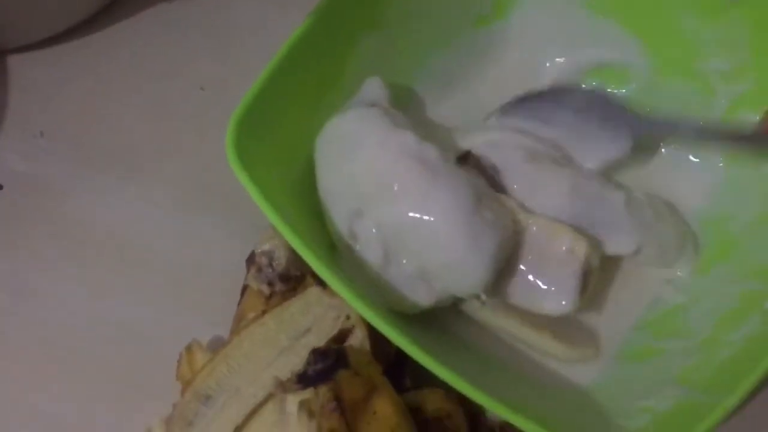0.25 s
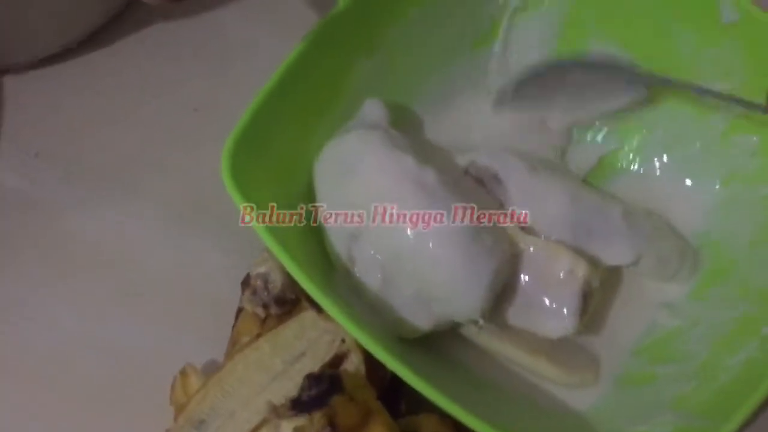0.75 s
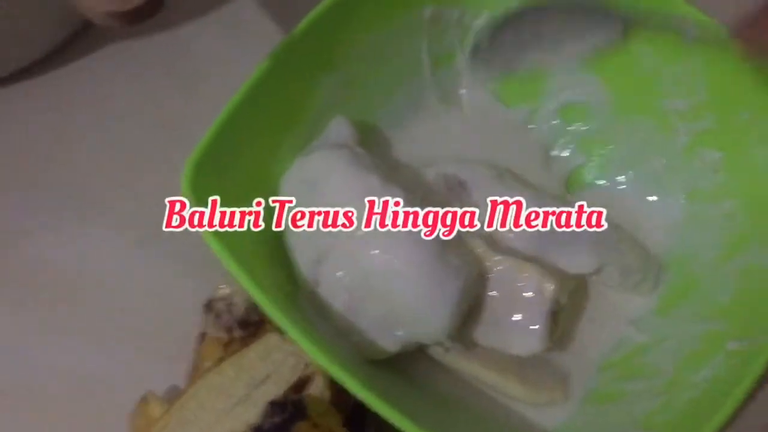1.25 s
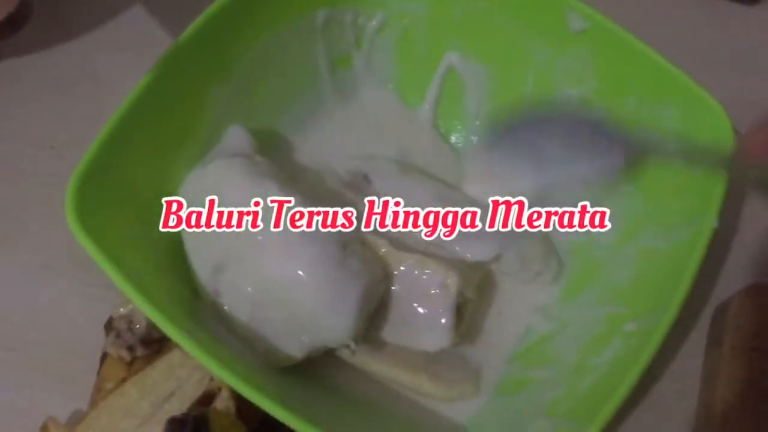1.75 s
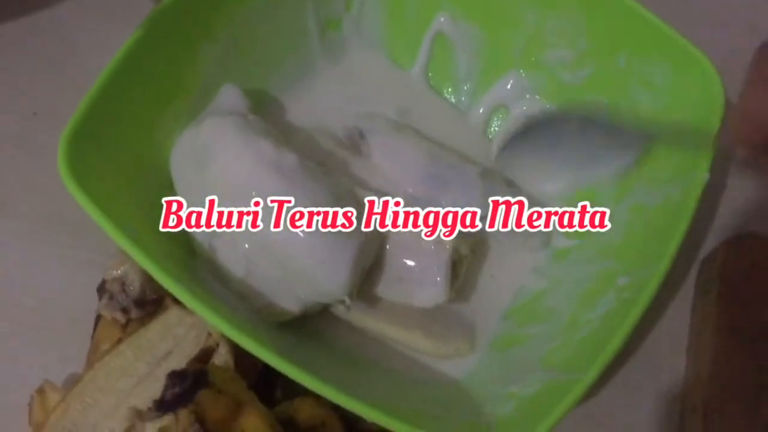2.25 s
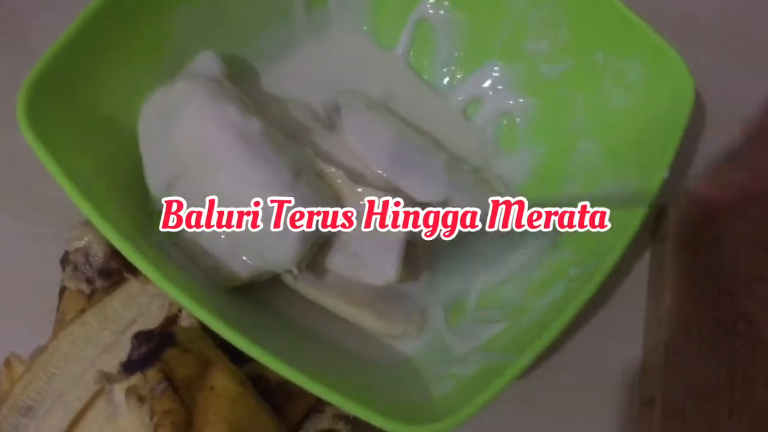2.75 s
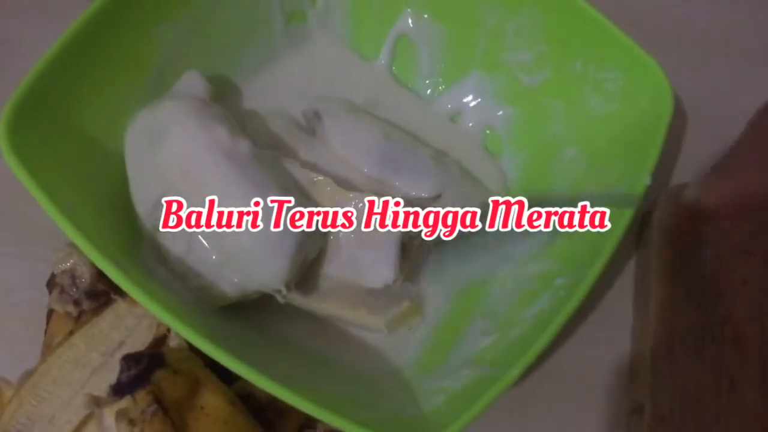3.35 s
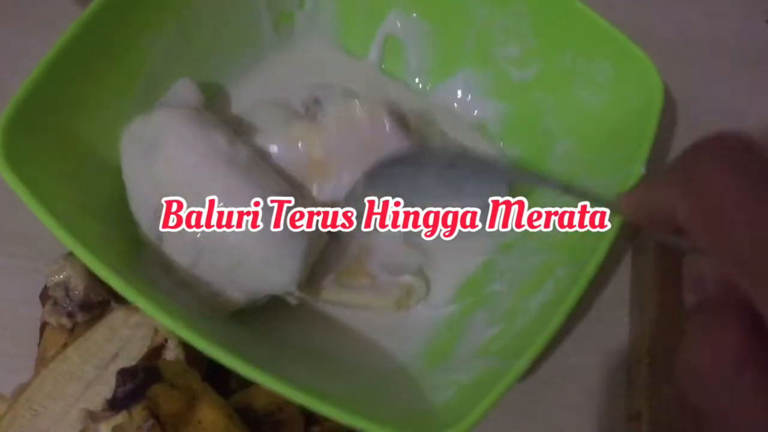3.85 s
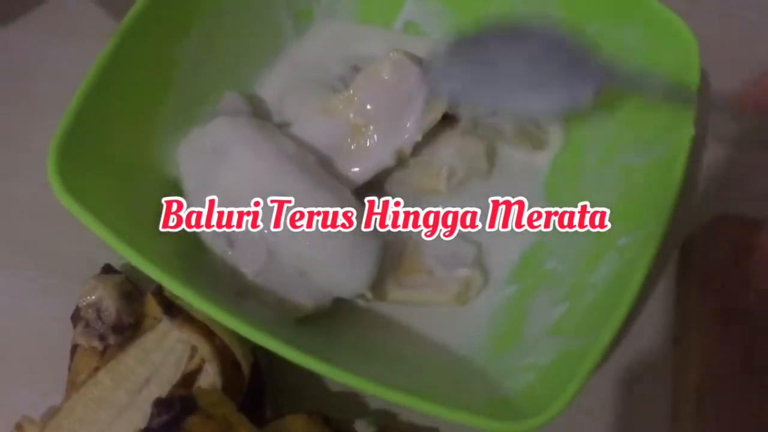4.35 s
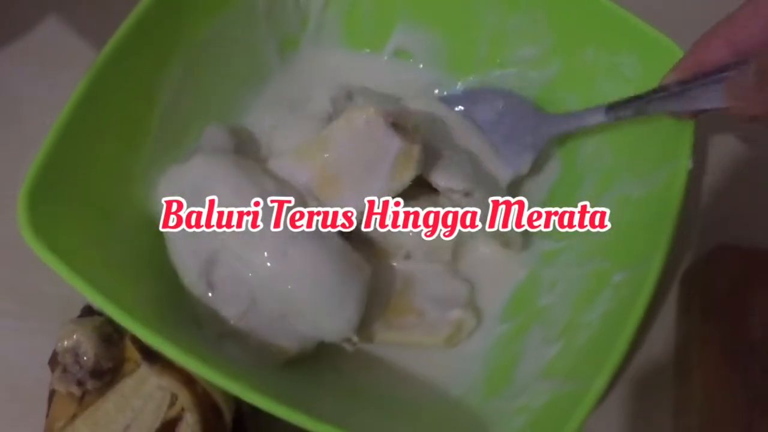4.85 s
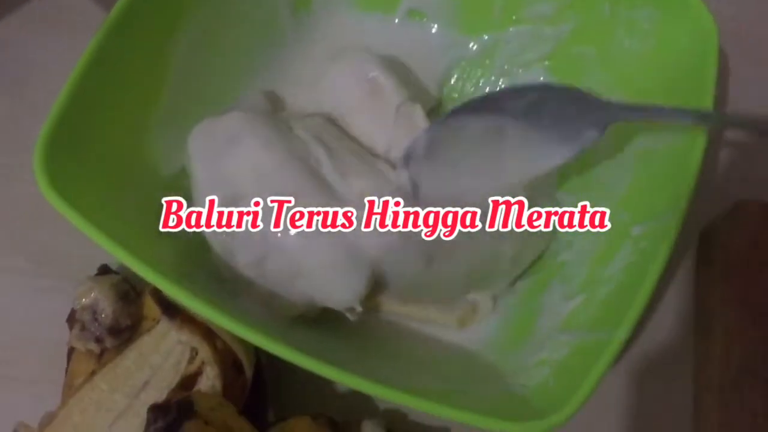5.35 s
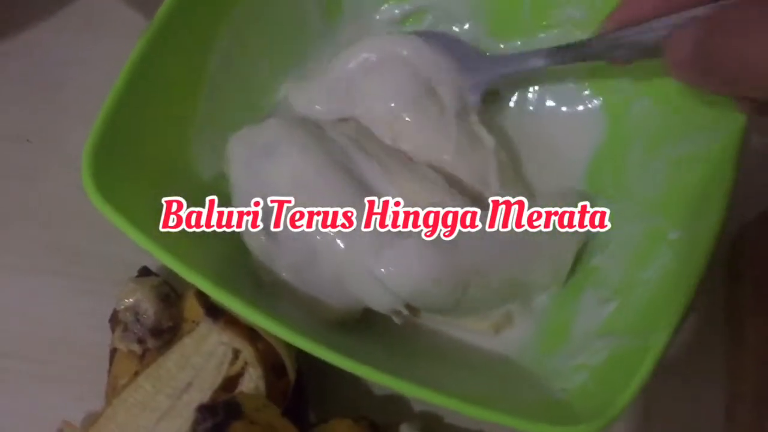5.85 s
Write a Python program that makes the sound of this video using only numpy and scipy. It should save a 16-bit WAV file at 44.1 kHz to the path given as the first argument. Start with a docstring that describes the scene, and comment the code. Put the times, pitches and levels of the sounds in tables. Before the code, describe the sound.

A metal spoon clacks sharply and scrapes around a plastic bowl, then gives way to soft wet squelches of batter over fruit in a small kitchen.

```python
"""On a kitchen worktop, a steel spoon works batter over pieces of fruit in a plastic bowl.
Strokes clack on the bowl (ringing modes) and rasp along its wall (showers of tiny slips).
The batter squelches, pops, smacks and crackles: random clicks, each group ringing around a pitch.
The small room rings briefly (fading noise). A faint wavering drone, like a far engine, comes from
outside, over low house air and an uneven rumble."""
import sys
import numpy as np
from scipy import signal
from scipy.fft import rfft, irfft, next_fast_len
from scipy.io import wavfile

SR = 44100
rng = np.random.default_rng(int(sys.argv[2]) if len(sys.argv) > 2 else 0)


def pcm_store(signal):
    """Save signal as 16-bit PCM."""
    levels = np.round(np.clip(np.atleast_2d(signal), -1, 1) * 32767)
    wavfile.write(sys.argv[1], SR, levels.astype(np.int16).T)


N = 269443
T = np.arange(N) / SR  # time in s
SIZE = 8192  # samples in one short sound
SHORT_T = np.arange(SIZE) / SR  # time within a short sound, in s
FREQ = np.fft.rfftfreq(SIZE, 1 / SR) + 1e-3  # in Hz, kept above zero for the divisions
POP_FADE_S, POP_Q = 0.0047, 4.2  # pops and smacks: fade time, and sharpness of pitch

# ways the bowl rings with the spoon against it: damped plastic, then thin longer rings
# columns: f/Hz, width/Hz, level/dB
BOWL_MODES = [(123, 52, -20), (286.5, 56, -9.5), (352.4, 42, -7.5), (611, 59, -5), (759, 74, -3.5),
              (917, 88, 1), (1070, 112, -1), (1350, 367, -4.5), (1750, 344, -3.5), (2160, 246, -7),
              (2368, 162, -5), (2714, 250, -12), (3510, 880, -9.5), (4050, 810, -10), (4540, 250, -15),
              (5330, 550, -20.5), (6570, 1170, -21.5), (8030, 3300, -27), (12700, 3200, -32.5),
              (2770, 32, -28), (3210, 84, -18.5), (3630, 200, -17.5), (4350, 25, -39), (6460, 38, -23),
              (10100, 78, -24)]


def undb(db):
    """Turn decibels into a gain."""
    return 10 ** (np.asarray(db) / 20)


def unit(x):
    """Scale to an average strength (rms) of 1."""
    return x / np.sqrt(np.mean(x ** 2))


def along(points, hz):
    """Read a curve of (Hz, value) points on a log-frequency axis."""
    f, value = np.transpose(points)
    return np.interp(np.log(hz + 1), np.log(f), value)


def colour(x, points, tilt_db=0, knee_hz=6500):
    """Filter by a (Hz, dB) curve, plus a tilt in dB per octave between 700 Hz and the knee."""
    size = next_fast_len(len(x) + 1024)
    hz = np.fft.rfftfreq(size, 1 / SR)
    octaves = np.log2(np.clip(hz, 700, knee_hz) / 2000)
    gain = undb(along(points, hz) + tilt_db * octaves)
    return irfft(rfft(x, size) * gain, size)[:len(x)]


def resonance(hz, width):
    """Frequency response of one damped ring, with gain 1 at its centre."""
    return 1 / (1 + 1j * (FREQ / hz - hz / FREQ) * hz / width)


def add(track, s, x):
    """Mix x into the track at time s, cutting what lies outside it."""
    i = int(round(s * SR))
    x, i = x[max(-i, 0):], max(i, 0)
    track[i:i + len(x)] += x[:max(len(track) - i, 0)]


def walk(size, rate):
    """Smooth random wander with a spread near 1, aiming at `rate` new values per second."""
    at = np.arange(size) / SR * rate
    return 1.2 * np.interp(at, np.arange(2048), rng.standard_normal(2048))


def grains(size, rate, spread_db):
    """Random tiny impulses of unequal strength, about `rate` per second."""
    present = rng.random(size) < rate / SR
    sign = rng.choice([-1, 1], size)
    return present * sign * undb(spread_db * rng.standard_normal(size))


def spot(hz, db, q):
    """Broad ring of the patch of wall under the spoon, as a frequency response."""
    return 1 + (undb(db) - 1) * resonance(hz, hz / q)


def scatter(db, fade_s):
    """Waves bounce around the bowl by random paths, drawn afresh for each call."""
    envelope = np.exp(-SHORT_T / fade_s) * (1 - np.exp(-SHORT_T / 0.00036))
    paths = rng.standard_normal(SIZE) * envelope
    direct = SHORT_T == 0
    return rfft(direct + undb(db) * paths / np.sqrt(np.sum(paths ** 2)))


def burst(fade_s, hz, width, click_rate=3500, spread_db=4, scatter_db=-1, scatter_s=0.0028, rise_s=0.0017):
    """A film of batter tears: a fading shower of clicks around one pitch."""
    clicks = rfft(grains(SIZE, click_rate, spread_db))
    clicks = unit(irfft(clicks * resonance(hz, width) * scatter(scatter_db, scatter_s)))
    return clicks * np.exp(-SHORT_T / fade_s) * (1 - np.exp(-SHORT_T / rise_s))


def background(waver_db=3.5, rumble_db=2.4, swell_db=3):
    """Low house air (noise), an uneven rumble and a wavering far drone with a weaker octave below."""
    # far drone; columns: t/s, f/Hz, level/dB
    drone_course = [(0, 159.8, -53.5), (3.5, 160, -63), (4.2, 156, -48.5), (4.9, 155.3, -49.5),
                    (5.499, 165.8, -52), (6.1, 165, -52)]
    # colour of the house air before its second filter; columns: f/Hz, level/dB
    air_colour = [(15, -54), (25, -36), (61, -7), (120, -14), (161, -5), (335, -10), (405, -22), (489, -22),
                  (560, -47), (1070, -34), (1330, -22.5), (1610, -35), (1940, -27.5), (7110, -33.5),
                  (16000, -38)]
    s, hz, db = np.transpose(drone_course)
    pitch = np.interp(T, s, hz) * (1 + 0.0554 * walk(N, 32))
    phase = 2 * np.pi * np.cumsum(pitch) / SR
    drone = unit(np.sin(phase) + undb(-9.5) * np.sin(phase / 2))
    drone = drone * undb(np.interp(T, s, db) + waver_db * walk(N, 7))

    air = unit(colour(rng.standard_normal(N), air_colour))
    air = colour(air, [(60, 0.0), (120, 0.5), (160, -5.0), (250, -10), (700, 7.0), (2500, 2.0),
                       (4500, -4.5), (7500, -12.5), (11000, -7.5), (15000, -13)])
    air = air * undb(-47 + rumble_db * walk(N, 5.0))

    # narrow bands of the rumble swell and fade on their own
    rumble = 0
    for hz in (58.2, 110.0, 209, 282, 341.0):
        strength = walk(N, 22) * undb(swell_db * walk(N, 4.4))
        rumble = rumble + strength * np.sin(2 * np.pi * hz * T)
    return drone + undb(-56.5) * unit(rumble) + air


def scrapes(slip_rate=9000, slip_db=2.5, judder_db=3.0, ring_db=3, steel_db=6, swell=4,
            spot_db=9.0, spot_q=5, scatter_db=0, scatter_s=0.0062):
    """Dense tiny slips of steel on plastic change loudness and colour with speed and stop as it lifts."""
    # spoon drags along the wall, a push and often a lighter return
    # columns: start t/s, fastest t/s, end t/s, level/dB, brightness/(dB per octave), rubbed spot f/Hz
    strokes = [(-0.03, -0.012, 0.032, -24, 4, 1090), (0.229, 0.306, 0.302, -20, 6, 1780),
               (0.472, 0.517, 0.522, -24, 3, 1170), (0.544, 0.556, 0.599, -24, 1.5, 1470),
               (0.707, 0.768, 0.783, -16, 4, 1270), (0.831, 0.863, 0.869, -31, -1.5, 1230),
               (1.036, 1.07, 1.122, -17.5, 2, 1320), (1.268, 1.294, 1.35, -21, -0.5, 1390),
               (1.326, 1.385, 1.424, -20, 1, 2170), (1.435, 1.467, 1.49, -29.5, -1, 1050),
               (1.613, 1.688, 1.711, -19.5, 3, 1450), (1.726, 1.755, 1.782, -25, 2, 1460),
               (1.928, 1.996, 2.036, -20.5, 3.5, 950), (2.021, 2.05, 2.086, -27, 0, 2210),
               (2.243, 2.259, 2.306, -22, 1.5, 665), (2.318, 2.35, 2.39, -21, -1.5, 3700),
               (2.742, 2.765, 2.865, -28, -4, 1700), (2.838, 2.867, 2.88, -24, -4.5, 1600),
               (3.05, 3.17, 3.185, -38.5, -4.5, 796), (3.37, 3.385, 3.406, -23.5, -0.5, 2350),
               (3.402, 3.43, 3.455, -35.5, -1.5, 870), (3.594, 3.632, 3.634, -29.5, 0, 720),
               (4.574, 4.677, 4.668, -30.5, 1.5, 890), (4.707, 4.776, 4.808, -35, -.5, 2780),
               (5.616, 5.623, 5.68, -32, 1.5, 1080), (5.703, 5.752, 5.78, -32.5, 0.5, 1075),
               (5.764, 5.807, 5.836, -25, 1, 2240)]
    # colour of the rasp; columns: f/Hz, level/dB
    rasp_colour = [(120, -81), (200, -30.5), (482, -8.5), (883, -2.5), (1210, -4), (1370, 0.5),
                   (1910, -5.5), (2380, -4), (3020, -5.5), (4430, -11.5), (5840, -20.5), (6640, -22.5),
                   (10700, -29), (12600, -28.5), (16000, -38.5)]
    press_s, lift_s = 0.022, 0.011  # the spoon settles on the wall and leaves it
    slow_db, slow_tilt_db = -4, -3.5  # slow spoon against fast: level, and dB per octave
    out = np.zeros(N)
    # the slips favour the bowl's modes and the thin ring of the spoon
    modes = sum(np.abs(resonance(hz, width)) ** 2 for hz, width, _ in BOWL_MODES)
    body = undb(ring_db * modes + steel_db * np.abs(resonance(9040, 230)) ** 2)
    for start, fastest, end, db, bright_db, spot_hz in strokes:
        slips = grains(SIZE, slip_rate, slip_db) * undb(judder_db * walk(SIZE, 340))
        slips = rfft(slips) * body * spot(spot_hz, spot_db, spot_q)
        # the fine resonances shift as the spoon travels from one place to the next
        here = irfft(slips * scatter(scatter_db, scatter_s))
        there = irfft(slips * scatter(scatter_db, scatter_s))
        now = start + SHORT_T
        travel = np.interp(now, [start, end], [0, 1])
        rasp = here * np.sqrt(1 - travel) + there * np.sqrt(travel)
        contact = np.clip(np.minimum(SHORT_T / press_s, (end - start - SHORT_T) / lift_s), 0, 1)
        speed = np.sin(np.interp(now, [start, fastest, end], [0, np.pi / 2, 0])) ** swell
        fast = colour(rasp, rasp_colour, bright_db)
        slow = undb(slow_db) * colour(rasp, rasp_colour, bright_db + slow_tilt_db)
        rasp = contact * (speed * fast + (1 - speed) * slow)
        # the level is the average over the time of contact
        add(out, start, undb(db) * rasp * np.sqrt(np.sum(contact ** 2) / np.sum(rasp ** 2)))
    return out


def crackle(pops, clump_db=4.0, split_hz=5000, thin_db=-3, tear=2.2):
    """Bubbles get louder in clumps; the high, small ones grow most as the batter is moved."""
    # level of the fine crackle of the batter as it is moved; columns: t/s, level/dB
    movement = [(0, -51), (.5, -59), (3.2, -62), (3.85, -55.5), (4.5, -61), (5.3, -57.5), (6.1, -55.5)]
    moved = undb(np.interp(T, *np.transpose(movement)))
    large = signal.sosfilt(signal.butter(2, split_hz, fs=SR, output="sos"), pops)
    small = signal.sosfilt(signal.butter(2, split_hz, "highpass", fs=SR, output="sos"), pops)
    vigour = (moved / moved.mean()) ** (tear - 1)
    large = large * undb(clump_db * walk(N, 24))
    small = small * vigour * undb(thin_db + clump_db * walk(N, 25))
    return moved * (large - small)


def batter(pop_rate=2400, pop_db=4, bubble_q=16, bubble_width_hz=180):
    """Tearing films make long squelches and short pops, over a fine crackle of ringing bubbles."""
    # batter sucks loose from the spoon; columns: t/s, level/dB
    squelches = [(3.468, -25), (3.764, -30), (3.905, -25.5), (4.076, -34.5), (4.128, -27), (4.161, -30.5),
                 (5.575, -37.5), (5.664, -38.5), (5.956, -43.5)]
    # single wet pops and ticks that stand out, low to very high; columns: t/s, level/dB, f/Hz
    lone_pops = [(.172, -30, 7260), (.337, -29, 14500), (2.959, -33, 2900), (3.964, -45, 5000),
                 (4.65, -21, 5000), (4.847, -43, 9120), (4.954, -38, 14400), (5.182, -34, 7800),
                 (5.562, -23.5, 2110)]
    fade_s, squelch_hz, width_hz = 0.033, 2260, 4700
    snap_db, snap_fade_s, snap_hz = 8.5, 0.0027, 6040  # the film breaks as a squelch starts
    out = np.zeros(N)
    for s, db in squelches:
        snap = undb(snap_db) * burst(snap_fade_s, snap_hz, width_hz)
        add(out, s, undb(db) * (snap + burst(fade_s, squelch_hz, width_hz)))
    for s, db, hz in lone_pops:
        add(out, s, undb(db) * burst(POP_FADE_S, hz, hz / POP_Q))
    # thick batter muffles the top of each burst
    out = colour(out, [(600, 5), (1500, -1.5), (5000, -5.5), (8000, -6.5), (11000, -8), (15000, -8.5)])
    # bubbles of many sizes, each swelling softly and ringing for a few milliseconds
    pops, sizes_hz = 0, np.geomspace(750, 15500, 48)
    for hz in sizes_hz:
        ring = irfft(resonance(hz, bubble_width_hz + hz / bubble_q) ** 2)[:1024]
        bubbles = grains(N, pop_rate / len(sizes_hz), pop_db)
        pops = pops + signal.oaconvolve(bubbles, ring)[:N]
    pops = colour(pops, [(1000, 5), (2600, 7.0), (4500, -2.0), (7000, -8), (10000, -12.0), (14000, -8)])
    return out + crackle(unit(pops))


def knocks(wall_s=0.0071, wall_db=-11, contact_s=0.0074, spot_q=6, scatter_db=-6, scatter_s=0.0046):
    """Each blow rings the damped bowl; batter under the spoon trades the sharp tick for a hollow clack."""
    # spoon strikes the bowl
    # columns: t/s, level/dB, cushion of batter (0 to 1), struck spot f/Hz, boost of that spot/dB
    blows = [(0.023, -15.5, 0.53, 1150, 6), (0.218, -11.5, 0.24, 1130, 2.5), (0.2487, -18.5, 0, 1860, 20),
             (0.468, -7.5, 0.31, 2330, 10), (0.511, -10.5, 0.87, 1350, 11), (0.6989, -21.5, 0.54, 650, 16),
             (0.7738, -14, 0.5, 2110, 5.5), (1.007, -10, 0.2, 840, 6.5), (1.089, -12.5, 0.45, 2700, 11),
             (1.2728, -15.5, 0.39, 1380, -6), (1.618, -13, 0.6, 1350, 3.5), (1.7, -24.5, .7, 980, 14),
             (1.9177, -19, 0.66, 1070, 4), (1.995, -17, 0, 1005, 8), (2.2484, -13.5, 0.2, 2740, 6),
             (2.7526, -11, 0.4, 1780, 5.5), (3.0239, -9.5, 0.4, 870, 4), (3.3141, -8, 0.1, 1460, 14.5),
             (3.5891, -9.5, 0.31, 700, 1), (4.2064, -16.5, 0.61, 1900, 4), (5.627, -24, 0.65, 1050, 7),
             (5.704, -27.5, 0.26, 1065, 12.5)]
    # colour of the contact for bare steel; columns: f/Hz, level/dB
    bare = [(950, 0.5), (1600, -5), (2500, -4.5), (4200, 4), (8000, 5.5)]
    # the same through a coat of batter; columns: f/Hz, level/dB
    coated = [(950, 1), (1600, 11), (2500, 5.5), (4200, -8.5), (8000, -21)]
    # neighbouring modes move in opposite senses, so the clack takes a moment to build
    bowl = 0
    for k, (hz, width, db) in enumerate(BOWL_MODES):
        bowl = bowl + (-1) ** k * undb(db) * resonance(hz, width)
    # a nearby wall returns the low part of the clack
    delay = np.exp(-2j * np.pi * FREQ * wall_s)
    bowl = bowl * (1 + undb(wall_db) * delay / (1 + (FREQ / 2500) ** 2))
    out = np.zeros(N)
    for s, db, cushion, spot_hz, spot_db in blows:
        contact_db = (1 - cushion) * along(bare, FREQ) + cushion * along(coated, FREQ)
        # fold the contact's response forward in time: nothing sounds before the contact
        cepstrum = irfft(np.log(undb(contact_db)))
        cepstrum[1:SIZE // 2] *= 2
        cepstrum[SIZE // 2:] = 0
        contact = np.exp(rfft(cepstrum))
        place = spot(spot_hz, spot_db, spot_q) * scatter(scatter_db, scatter_s)
        clack = irfft(bowl * contact * place)[:SIZE // 2]  # the damped plastic is silent by then
        # the level is set as if all the energy fell within contact_s
        add(out, s, undb(db) * clack * np.sqrt(contact_s * SR / np.sum(clack ** 2)))
    return out


def smacks(count=300):
    """Pieces of coated fruit stick and part: small pops of many sizes, with random pauses between."""
    rate, level_db = 27, -46  # average smacks per second, and their level
    usual_hz, spread_octaves = 1700, 0.4
    out = np.zeros(N)
    chance = rng.standard_normal((count, 3))
    pauses = (chance[:, 0] ** 2 + chance[:, 1] ** 2) / 2 / rate
    for s, size in zip(np.cumsum(pauses), chance[:, 2]):
        if s < T[-1]:
            hz = usual_hz * 2 ** (spread_octaves * size)
            add(out, s, undb(level_db) * burst(POP_FADE_S, hz, hz / POP_Q))
    return out


def kitchen(x, wet_db=-11, build_s=0.0071):
    """Diffuse tail of a small hard room: noise bands that fade at their own pace."""
    # how long the kitchen rings (time to fall by 60 dB); columns: f/Hz, ring time/s
    ring_times = [(200, 0.14), (1200, 0.44), (3500, 0.4), (8000, 0.36), (15000, 0.14)]
    size = SR * 3 // 4
    t, hz = np.arange(size) / SR, np.fft.rfftfreq(size, 1 / SR)
    noise, tail = rfft(rng.standard_normal(size)), 0
    for k, (_, t60) in enumerate(ring_times):
        # each band blends into its neighbours
        share = along([(f, j == k) for j, (f, _) in enumerate(ring_times)], hz)
        tail = tail + irfft(noise * share, size) * np.exp(-np.log(1000) * t / t60)
    tail = tail * (1 - np.exp(-(t / build_s) ** 2))
    tail = tail / np.sqrt(np.sum(tail ** 2))
    tail = colour(tail, [(250, 14), (1200, -3), (3000, -5), (8000, -5.5), (15000, 1)])
    return undb(wet_db) * signal.fftconvolve(x, tail)[:N]


def scene():
    """Spoon, bowl and batter close by, in the kitchen, over the background."""
    near = scrapes() + batter() + knocks() + smacks()
    return (near + kitchen(near) + background())[None]


def record(dry, ceiling=1.0, top_hz=16300):
    """Round the hardest peaks and cut the treble above top_hz."""
    rounded = dry / (1 + (dry / ceiling) ** 6) ** (1 / 6)
    return signal.sosfilt(signal.ellip(8, .2, 70, top_hz, fs=SR, output="sos"), rounded)


dry = scene()
out = record(dry)
pcm_store(out)
```